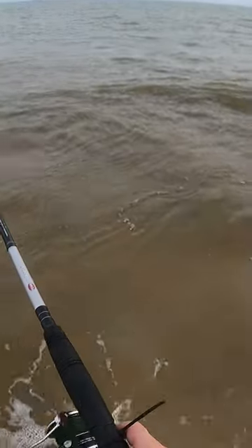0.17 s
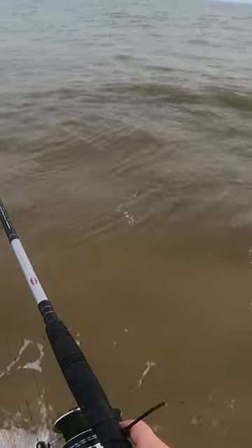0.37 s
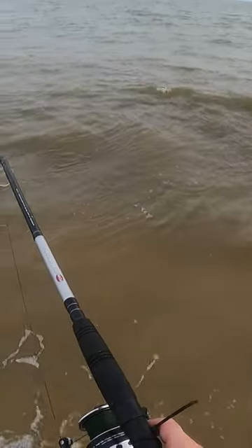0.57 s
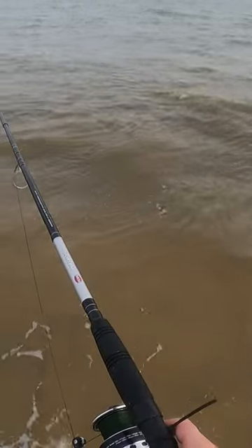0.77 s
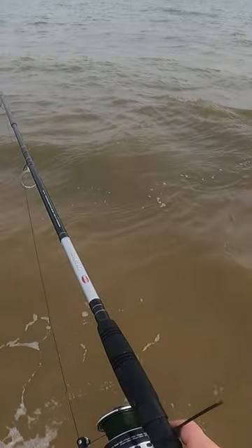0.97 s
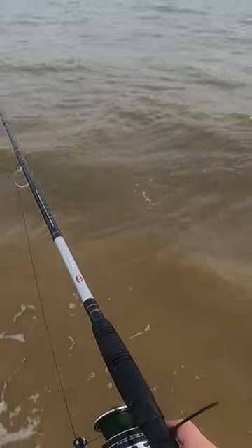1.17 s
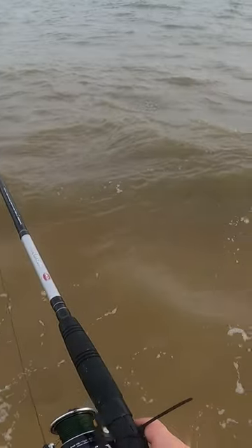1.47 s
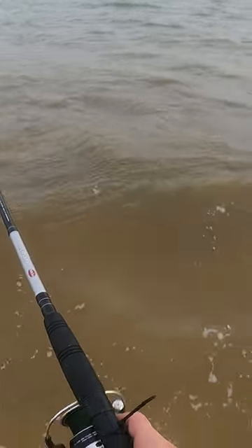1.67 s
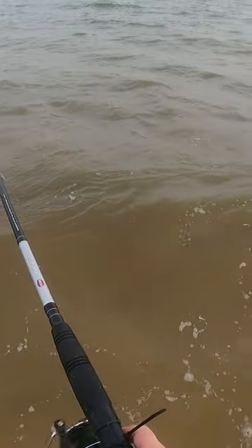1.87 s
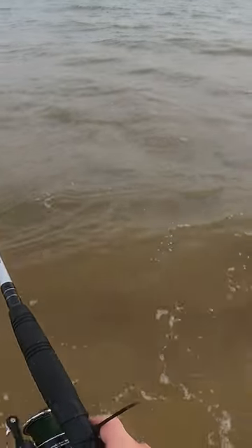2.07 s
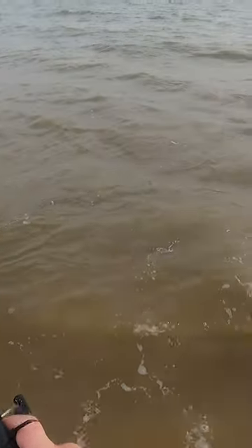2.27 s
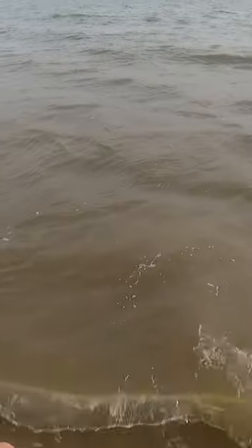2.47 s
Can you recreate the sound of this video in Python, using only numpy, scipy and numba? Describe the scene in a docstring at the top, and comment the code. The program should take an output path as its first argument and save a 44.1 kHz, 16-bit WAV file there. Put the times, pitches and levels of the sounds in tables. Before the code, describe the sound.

Sea waves: steady surf roar with gusty wind rumble on the microphone, ending in a nearby splashing breaker

```python
"""Standing in shallow sea water. From the start gusts of wind rumble on the microphone of a small camera
(filtered noise) while surf washes along the beach as a dense roar (coloured noise mixed with ringing bubbles).
Small crests splash from 0.3 s on (short noise bursts). After 2.2 s a wave breaks close by, splashing too: a
coarser mix of noise and bubbles, with big air pockets ringing low in it, as the wind dies down."""
import sys
import numpy as np
from scipy import signal
from scipy.fft import rfft, irfft, next_fast_len
from scipy.io import wavfile
from scipy.ndimage import uniform_filter1d
from numba import njit

SR = 44100
rng = np.random.default_rng(int(sys.argv[2]) if len(sys.argv) > 2 else 0)


def put_to_file(sound):
    """Save the sound as 16-bit audio at rate SR, in the file named by the first command-line argument."""
    columns = np.atleast_2d(sound).T  # one column per channel
    safe = np.clip(columns, -1, 1)
    whole_steps = np.round(safe * 32767)
    wavfile.write(sys.argv[1], SR, whole_steps.astype(np.int16))


def natural_amplitude(level_db):
    """Convert a level in decibels to a linear amplitude factor, elementwise."""
    exponent = np.asarray(level_db, float) / 20
    return 10 ** exponent


N = 115542


def column(table, k):
    """One column of a table, interpolated over time to all samples."""
    rows = np.array(table, float)
    return np.interp(np.arange(N) / SR, rows[:, 0], rows[:, k])


def unit(x):
    """Scale to rms 1."""
    return x / np.sqrt(np.mean(x ** 2))


def walk(rate_hz):
    """Random levels held 1 / rate_hz s and slewed twice, without slow drift; rms 1."""
    hold = int(SR / rate_hz)
    steps = np.repeat(rng.standard_normal(N // hold + 1), hold)
    slewed = uniform_filter1d(uniform_filter1d(steps, hold), hold)[:N]
    return unit(slewed - uniform_filter1d(slewed, 2 * hold))


def even(x):
    """Level control: divides a sound by part of its short-term envelope, so it stays steadier; rms 1."""
    window, share = int(.06 * SR), .6
    power = uniform_filter1d(uniform_filter1d(x ** 2, window), window)
    return unit(x / (power + 1e-12) ** (share / 2))


@njit
def svf(x, hz, damping):
    """State-variable filter with a moving centre: low, band and high outputs."""
    y, band_state, low_state = np.empty((3, len(x))), 0., 0.
    for i in range(len(x)):
        g = np.tan(np.pi * hz[i] / SR)
        band = (band_state + g * (x[i] - low_state)) / (1 + g * (g + damping))
        low = low_state + g * band
        band_state, low_state = 2 * band - band_state, 2 * low - low_state
        y[0, i], y[1, i], y[2, i] = low, damping * band, x[i] - damping * band - low
    return y


@njit
def ring(start, hz, cycles, size, glide):
    """Each bubble is a sine that dies in a few cycles while its pitch climbs."""
    y = np.zeros(N)
    for j in range(len(start)):
        decay = cycles[j] * SR / hz[j]  # samples to fall to 1/e
        turn = np.exp(2j * np.pi * hz[j] / SR - 1 / decay)
        climb = np.exp(2j * np.pi * hz[j] / SR * glide / decay)  # pitch rises by share glide per decay
        z = size[j] + 0j
        for i in range(start[j], min(N, start[j] + int(4 * decay))):
            z, turn = z * turn, turn * climb
            y[i] += z.imag
    return y


def bubbles(spread_db, cycles):
    """A dense cloud of bubbles of all sizes, about even in energy per Hz."""
    per_s = 5000
    when, pitch, strength, damping = rng.random((int(per_s * N / SR), 4)).T
    hz = 250 * 52 ** pitch  # 250 to 13000 Hz
    size = natural_amplitude(-spread_db * np.log(1 - .98 * strength)) * hz / 1000
    return unit(ring((when * N).astype(np.int64), hz, cycles * (.5 + damping), size, 0.079))


def water(colour, bubble_share, spread_db, cycles, swell_db, flicker_db, low_db, high_db, foam_db):
    """Coloured noise and bubbles in overlapping bands; neighbours swell together and each band flickers alone."""
    roar_hz, hiss_hz = 840, 3500
    foam_hz, foam_octaves = 3100, .45
    band_octaves = .4
    rows, size = np.array(colour, float), next_fast_len(N)
    octave = np.log2(np.arange(size // 2 + 1) * SR / size + 1)
    shape = natural_amplitude(np.interp(octave, np.log2(rows[:, 0]), rows[:, 1]))
    shape = shape / np.sqrt(np.mean(shape ** 2))

    grains = rfft(bubbles(spread_db, cycles), size)
    grains = grains / np.sqrt(uniform_filter1d(abs(grains) ** 2, 801) / N)  # flatten the spectrum
    noise = rfft(rng.standard_normal(N), size)
    full = (np.sqrt(1 - bubble_share) * noise + np.sqrt(bubble_share) * grains) * shape

    swells = [walk(38) for _ in range(7)]  # one every three bands, blended between
    out = np.zeros(N)
    for k, hz in enumerate(100 * 2 ** np.arange(0, 7.6, band_octaves)):
        distance = np.clip((octave - np.log2(hz)) / band_octaves, -1, 1)
        band = irfft(full * np.cos(np.pi / 2 * distance) ** 2, size)[:N]
        swell = sum(max(0, 1 - abs(k / 3 - j)) * s for j, s in enumerate(swells))
        tilt_db = low_db / (1 + (hz / roar_hz) ** 4) + high_db / (1 + (hiss_hz / hz) ** 4)
        hump_db = foam_db * np.exp(-(np.log2(hz / foam_hz) / foam_octaves) ** 2)
        out += band * natural_amplitude(swell_db * swell + flicker_db * walk(40.08) + tilt_db + hump_db)
    return out


def wind():
    """Eddies at the port: a rumble whose edges move with each gust, over a slower deep thud."""
    # gusts: start_s, level_db, rumble_upper_edge_hz (nominal), deep_rel_db (before offset), rumble_lower_edge_hz
    gusts = [(0, -19.5, 242, -1.5, 85), (.1, -24, 274, -3, 101), (.2, -22, 278, -7, 152),
             (.3, -22, 304, -5, 130), (.38, -24, 244, 4, 85.5), (.47, -20.5, 293, -3, 96),
             (.53, -23.5, 205, 3, 74.6), (.62, -22.5, 198, -0.5, 79), (.7, -23, 212, 3, 85),
             (.77, -27, 237, -2, 90), (.87, -23, 234, 1, 85.4), (1.0, -27, 258, 3.5, 90),
             (1.1, -25, 265, -4, 119), (1.18, -21.5, 246, -6, 100), (1.3, -22, 322, 3, 90.5),
             (1.37, -25, 223, -1, 90), (1.5, -23.5, 259, -5.5, 103), (1.7, -25, 234, -1.5, 93.5),
             (1.83, -21.5, 227, 0.5, 80), (1.9, -20.5, 266, -3, 95), (1.97, -19.5, 280, -8, 110),
             (2.06, -21, 253, 0.5, 120), (2.1, -25, 215, -1.5, 110), (2.25, -26.5, 302, -6, 151),
             (2.42, -31.5, 219, 4.5, 91), (2.62, -39.5, 260, 10.5, 91)]
    deep_hz, deep_offset_db = 57.4, -0.5
    edge_wander_db = .3
    edge = np.clip(column(gusts, 2) * natural_amplitude(edge_wander_db * walk(7.95)), 80, 600)
    rumble = svf(rng.standard_normal(N), column(gusts, 4), 1.69)[2]
    rumble = svf(rumble, edge, 1.1)[0]
    rumble = svf(rumble, edge * 0.95, 1.09)[0]
    rumble = svf(rumble, edge * 1.5, 1.0)[0] / np.sqrt(edge)
    deep = svf(rng.standard_normal(N), np.full(N, deep_hz), 1.5)[1]
    deep = svf(deep, np.full(N, 140.), 0.88)[0]
    deep_gain = natural_amplitude(deep_offset_db + column(gusts, 3) + 0.3 * walk(13))
    mix = natural_amplitude(0.71 * walk(30.0)) * even(rumble) + deep_gain * even(deep)
    return natural_amplitude(column(gusts, 1)) * mix


def wash():
    """Surf running along the shore, smooth with distance: mostly noise, few bubbles standing out."""
    # surf: start_s, level_db (before the tilts), low_roar_rel_db, hiss_rel_db, upper_mid_foam_rel_db
    surf = [(0, -31, 7.5, 1.5, -0.5), (.15, -32, 8, 1, 0.5), (.3, -33.5, 8.5, 2, 1.5),
            (.42, -33.5, 4, 1, 1.5), (.55, -37.5, 11, 6, 1), (.67, -39, 7.5, 6, 2.2),
            (.8, -33.5, 4.5, 3, -1.7), (.95, -34, 4, 3, 2), (1.13, -31.5, 1, 1, 2.8),
            (1.22, -33.5, 7, 3, 3.3), (1.31, -29.5, -3, 0.5, 2.5), (1.4, -31.5, 2, 5, 1.3),
            (1.55, -30.5, 4, 3, 0.2), (1.71, -30.5, 7.5, 1.5, -0.3), (1.8, -29.5, 3.5, 1.5, -2),
            (1.88, -29.5, 7, 2, 1.7), (1.96, -28, 4.5, 0, 1.7), (2.1, -31, 6, 4.5, -0.8),
            (2.22, -35.5, 9, 7, 0), (2.62, -30.5, 11.5, 9.5, 3)]
    # surf colour: frequency_hz, density_db (per Hz, relative)
    surf_colour = [(150, -11), (300, -3.5), (450, -3), (700, -4.5), (1100, -4.5), (1700, -3.5),
                   (2500, -8.5), (4000, -17.5), (6000, -25), (8000, -30.5), (9000, -36.5), (10500, -43.5),
                   (12000, -51), (14200, -62), (14800, -74)]
    body = water(surf_colour, bubble_share=.24, spread_db=3.0, cycles=3.0, swell_db=.6, flicker_db=.6,
                 low_db=column(surf, 2), high_db=column(surf, 3), foam_db=column(surf, 4))
    return natural_amplitude(column(surf, 1)) * body


def splashes():
    """Splashes of small crests and, from 2.3 s, of the breaking wave: short bursts of broad-band spray."""
    # bursts of spray: start_s, level_db (before the envelope), centre_hz (of the band filters), fade_s
    bursts = [(.33, -60, 6500, 0.016), (.855, -39, 4500, 0.023), (1.08, -40, 3500, .01),
              (1.265, -42, 4960, 0.033), (1.4, -57, 5500, 0.016), (1.867, -46, 4500, 0.025),
              (1.96, -44, 3000, 0.038), (2.325, -38, 2500, 0.016), (2.365, -33, 1800, .015),
              (2.4, -39, 5000, 0.02), (2.455, -43, 4500, .02), (2.495, -42, 5500, .02)]
    rise_s = .006
    out, age = np.zeros(N + SR), np.arange(SR // 4) / SR
    for start_s, level_db, centre_hz, fade_s in bursts:
        centre = np.full(len(age), 1. * centre_hz)
        spray = svf(rng.standard_normal(len(age)), centre, 0.72)[1]
        spray = svf(spray, centre, 0.72)[1]
        spray = unit(svf(spray, 0.87 * centre, 1.1)[0])
        envelope = (1 - np.exp(-age / rise_s)) * np.exp(-age / fade_s)
        out[int(start_s * SR):][:len(age)] += natural_amplitude(level_db) * envelope * spray
    return out[:N]


def air_pockets():
    """Big air pockets trapped by the falling wave: low damped sines, slightly smoothed."""
    # pockets: start_s, level_db (before smoothing), pitch_hz (at onset), decay_cycles
    pockets = [(2.455, -21, 574, 10), (2.505, -18.5, 381, 6), (2.54, -18, 770, 5.4),
               (2.572, -16.5, 506, 10.5), (2.574, -21, 320, 3.7), (2.605, -23, 343, 5)]
    start_s, level_db, pitch_hz, cycles = np.array(pockets, float).T.copy()
    rings = ring((start_s * SR).astype(np.int64), pitch_hz, cycles, natural_amplitude(level_db), 0.038)
    return uniform_filter1d(rings, size=24)


def breaker():
    """The wave that curls and falls a few steps away, fuller as it collapses, with air pockets ringing in it."""
    # fall: start_s, level_db (before the tilts), low_roar_rel_db, hiss_rel_db, upper_mid_foam_rel_db
    fall = [(2.2, -43, 2, 1, -4), (2.28, -31.5, 0, -5, 1), (2.33, -29, -18, 0.5, 1),
            (2.37, -27, -2, -2, -2), (2.41, -24.5, -1, 1, 1.5), (2.45, -24.5, 1, -0.5, 0.5),
            (2.5, -25.5, 1, 2, 1.5), (2.55, -26, 8.5, -1.5, 1.5), (2.62, -26, 9, -1, 4)]
    # fall colour: frequency_hz, density_db (per Hz, relative)
    fall_colour = [(150, -8), (350, -6.5), (600, -9.5), (1100, -3.5), (2000, -11), (3500, -16.5),
                   (5000, -19), (8000, -30), (9000, -36.5), (10500, -42), (12000, -54), (14200, -60),
                   (14800, -79)]
    fade_in_s = .05  # ends at the first row
    gate = np.clip((np.arange(N) / SR - fall[0][0]) / fade_in_s + 1, 0, 1)
    body = water(fall_colour, bubble_share=.35, spread_db=4.5, cycles=3.0, swell_db=1.0, flicker_db=.7,
                 low_db=column(fall, 2), high_db=column(fall, 3), foam_db=column(fall, 4))
    return air_pockets() + gate * natural_amplitude(column(fall, 1)) * body


def scene():
    """All sources at one microphone."""
    return (wind() + wash() + splashes() + breaker())[None]


def band_limit(x):
    """A steep low-pass at the top of the band."""
    return signal.sosfilt(signal.butter(12, 14880, fs=SR, output="sos"), x)


def record(dry):
    """The camera rounds the strongest peaks (tanh) and sets the output level."""
    mix = np.tanh(1.012 * dry) / 1.202
    return band_limit(mix)


dry = scene()
out = record(dry)
put_to_file(out)
```